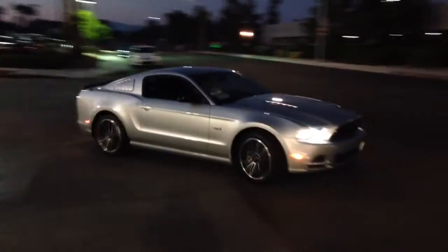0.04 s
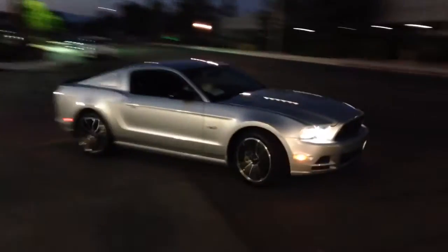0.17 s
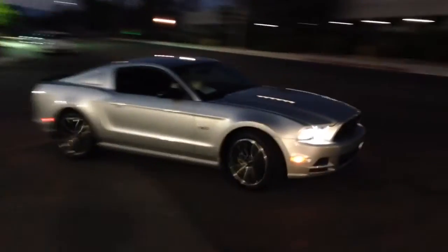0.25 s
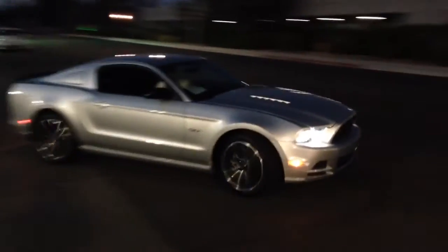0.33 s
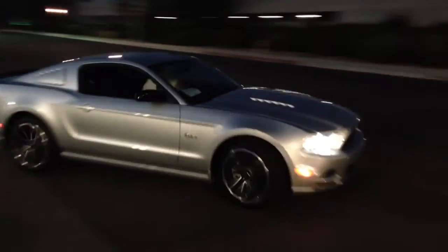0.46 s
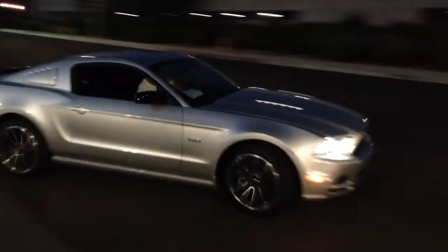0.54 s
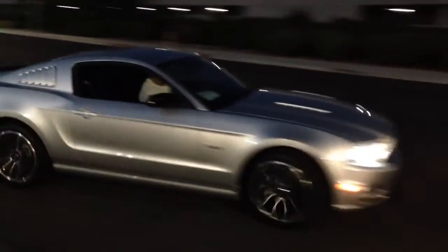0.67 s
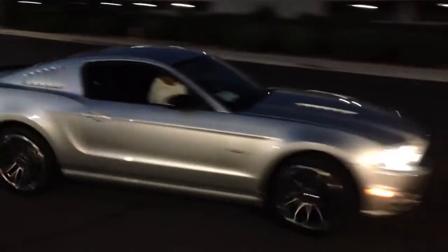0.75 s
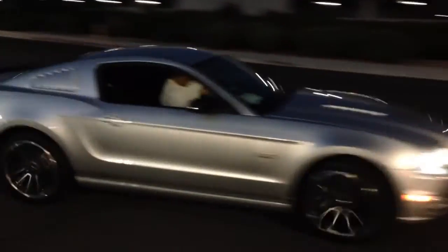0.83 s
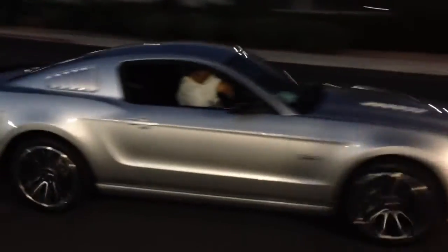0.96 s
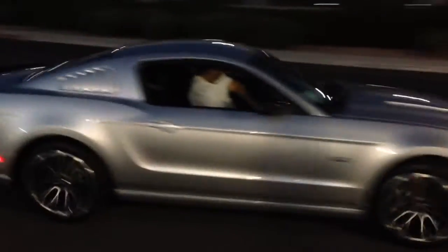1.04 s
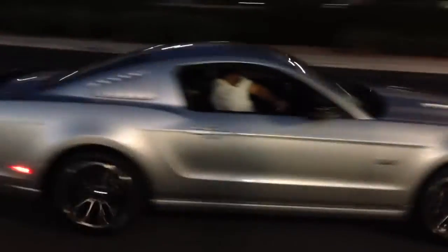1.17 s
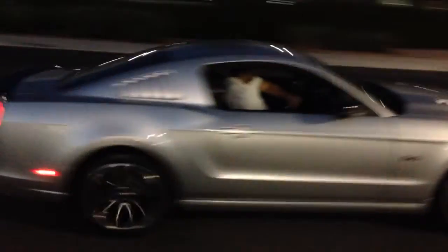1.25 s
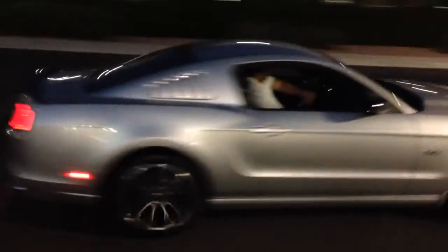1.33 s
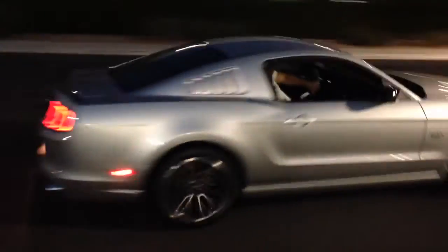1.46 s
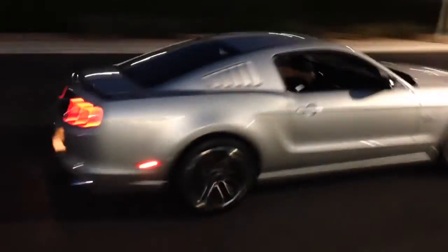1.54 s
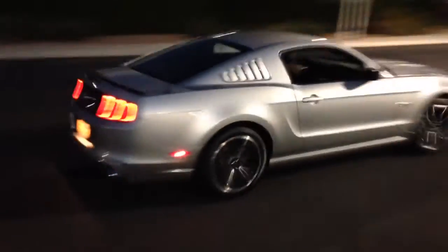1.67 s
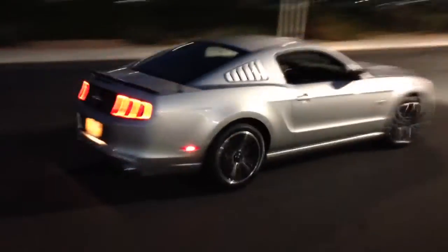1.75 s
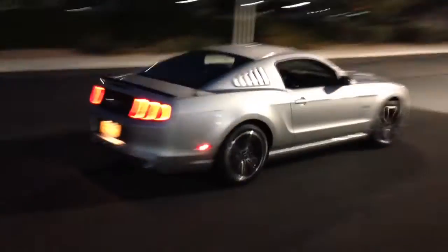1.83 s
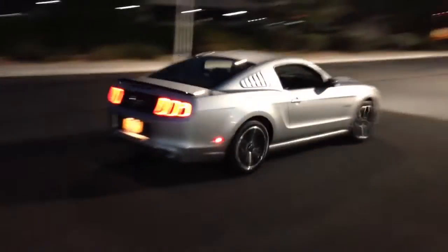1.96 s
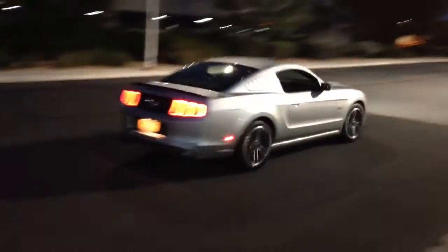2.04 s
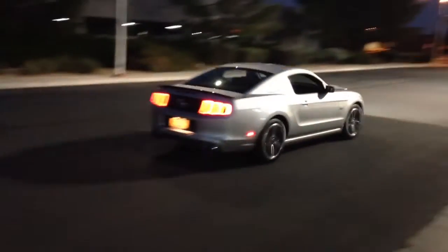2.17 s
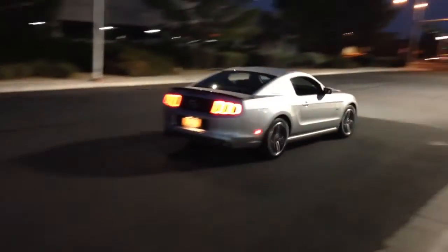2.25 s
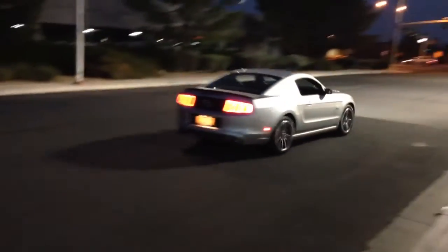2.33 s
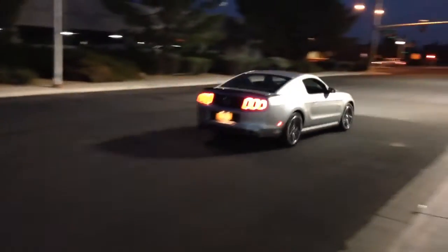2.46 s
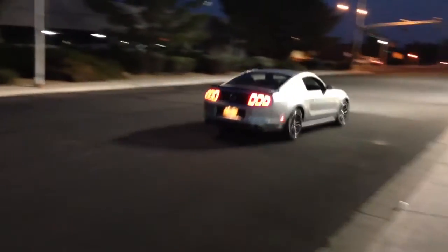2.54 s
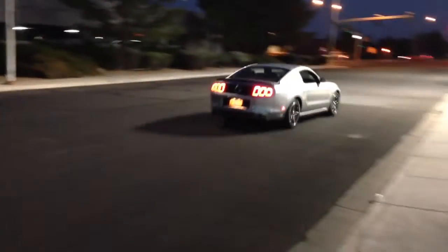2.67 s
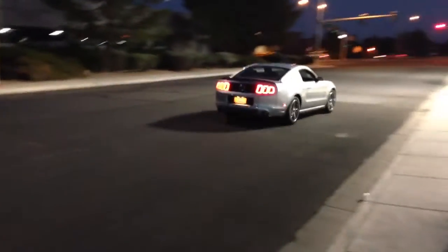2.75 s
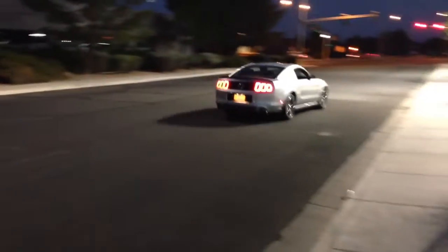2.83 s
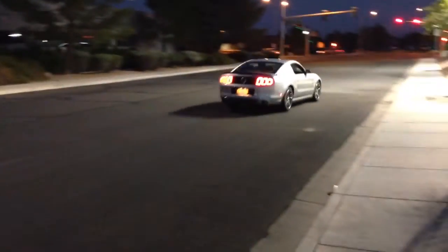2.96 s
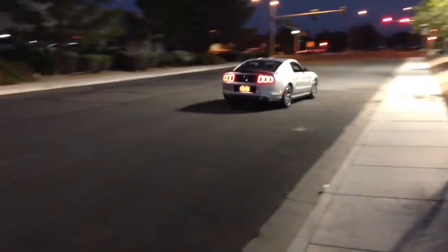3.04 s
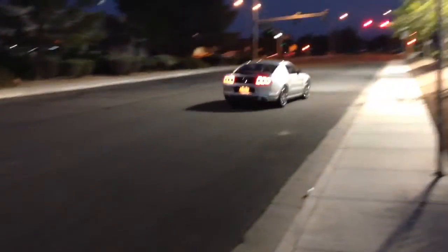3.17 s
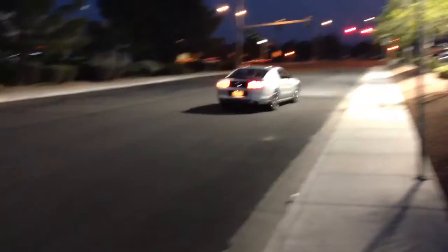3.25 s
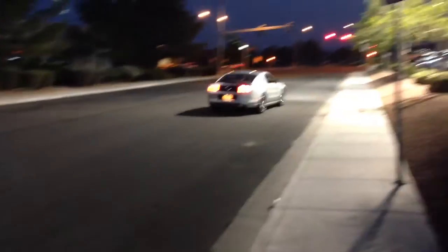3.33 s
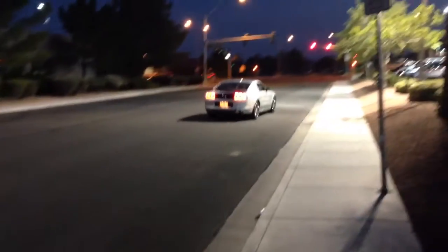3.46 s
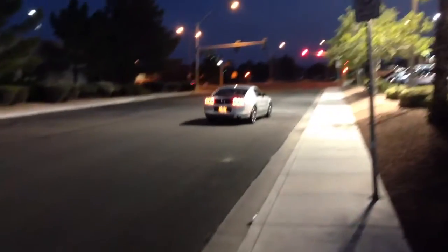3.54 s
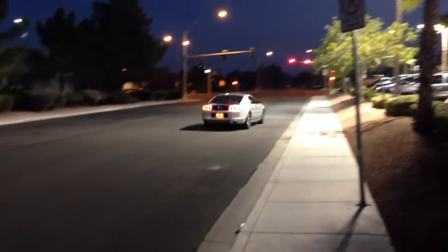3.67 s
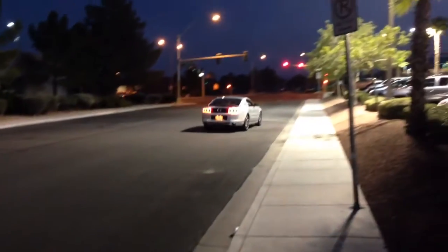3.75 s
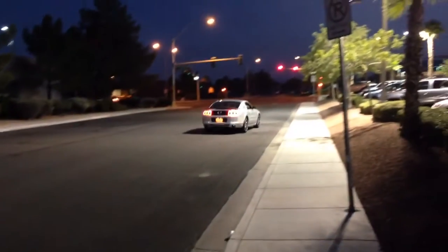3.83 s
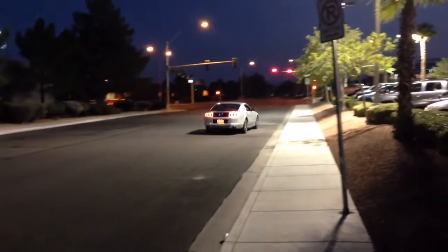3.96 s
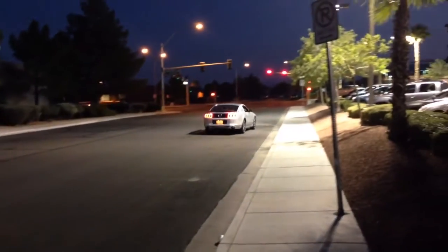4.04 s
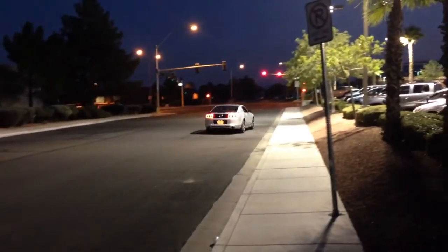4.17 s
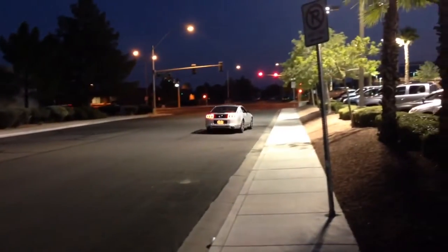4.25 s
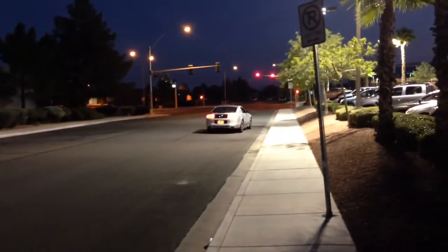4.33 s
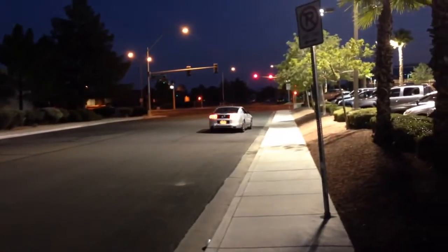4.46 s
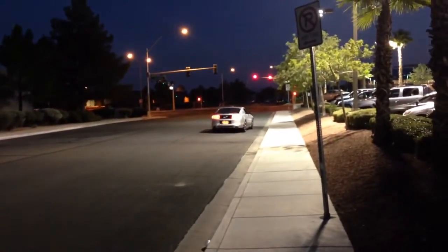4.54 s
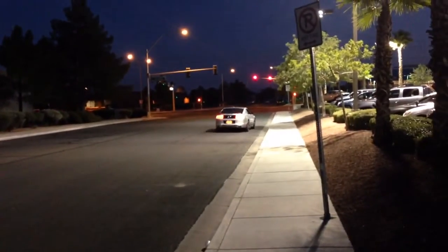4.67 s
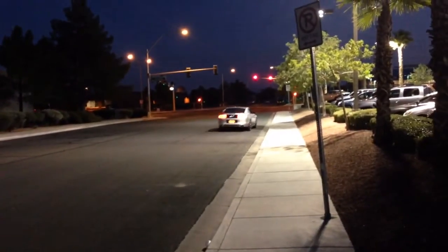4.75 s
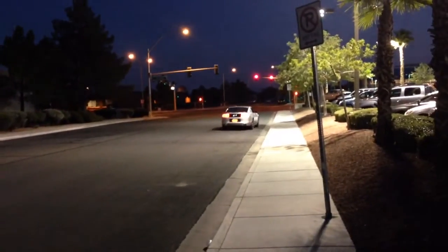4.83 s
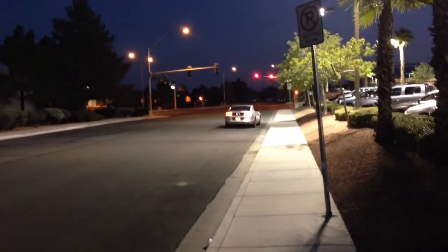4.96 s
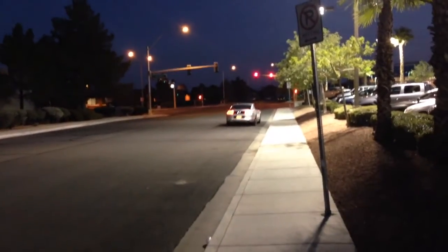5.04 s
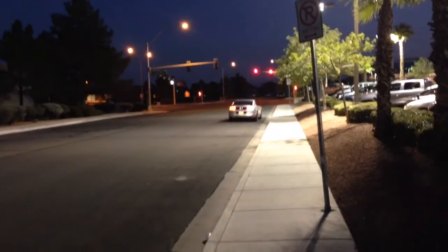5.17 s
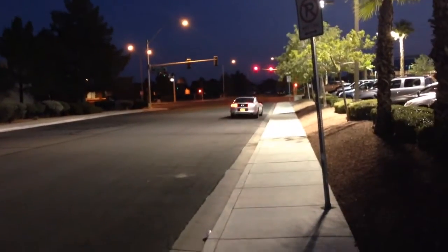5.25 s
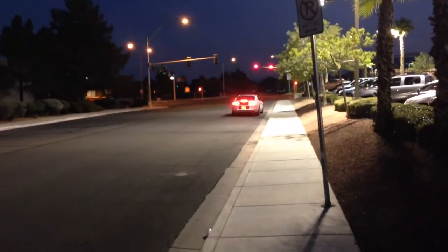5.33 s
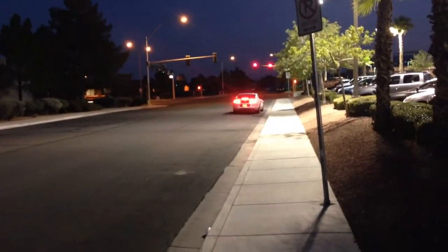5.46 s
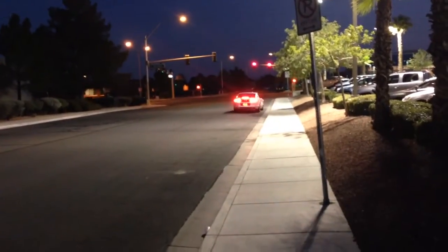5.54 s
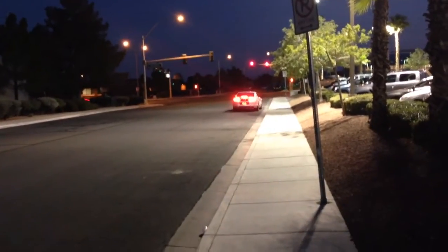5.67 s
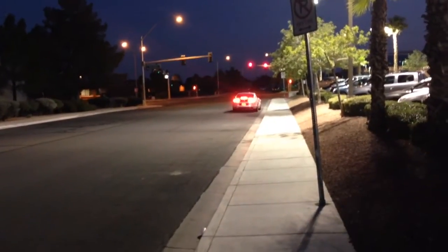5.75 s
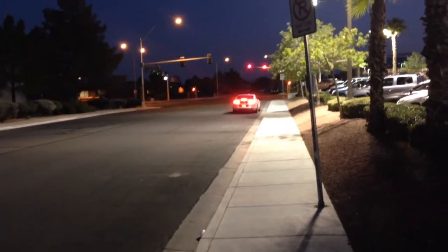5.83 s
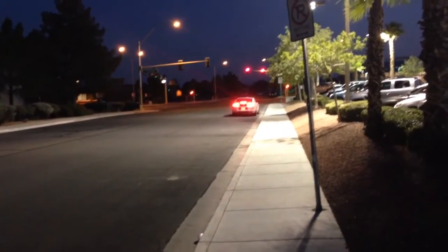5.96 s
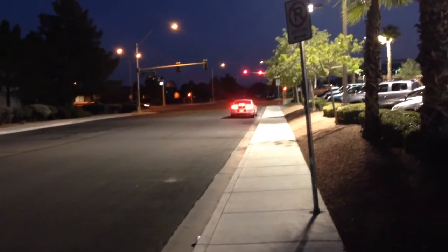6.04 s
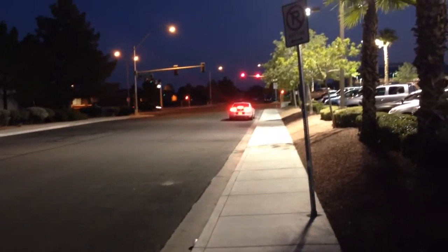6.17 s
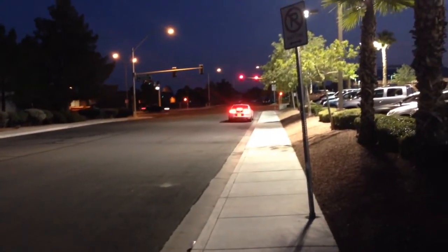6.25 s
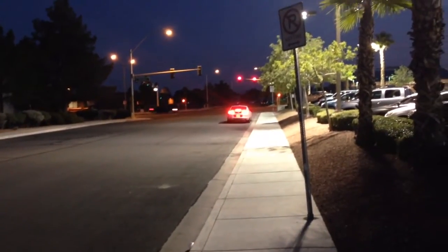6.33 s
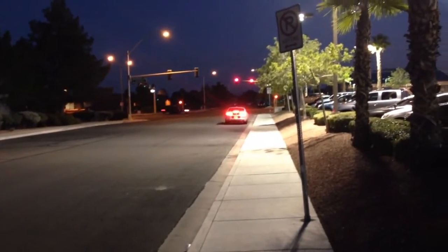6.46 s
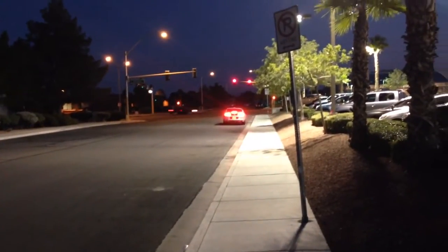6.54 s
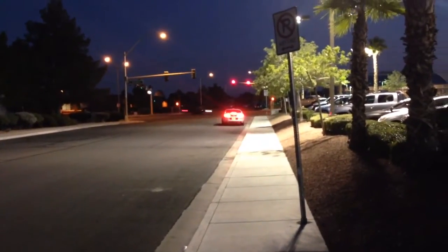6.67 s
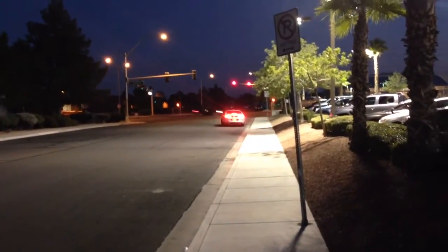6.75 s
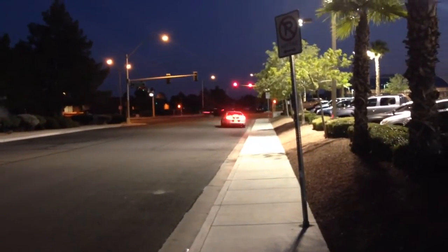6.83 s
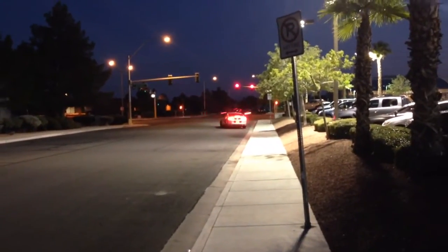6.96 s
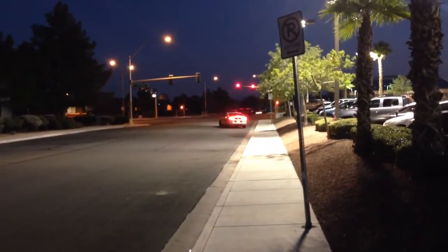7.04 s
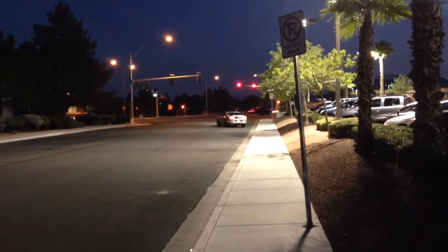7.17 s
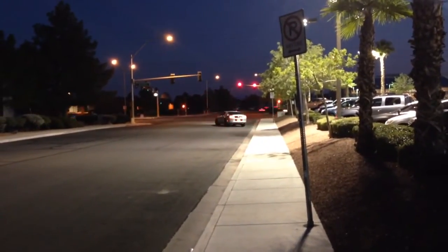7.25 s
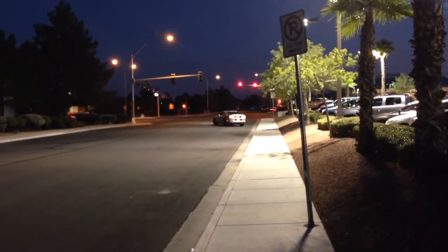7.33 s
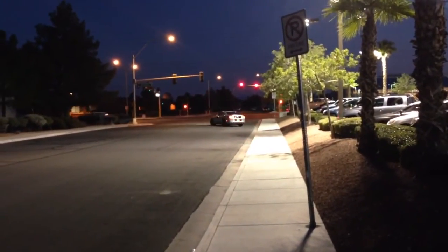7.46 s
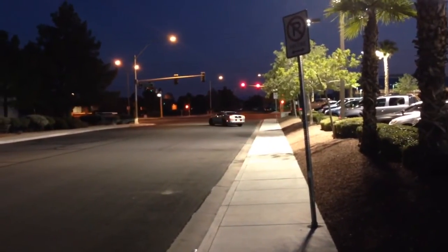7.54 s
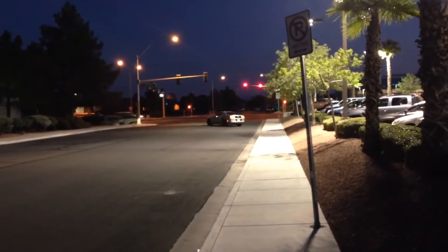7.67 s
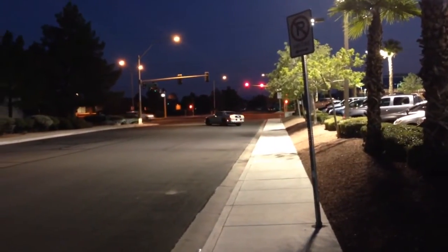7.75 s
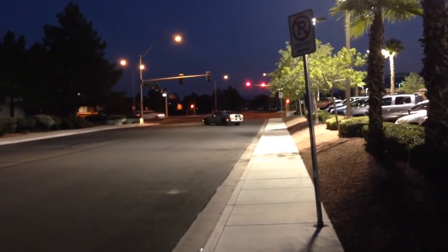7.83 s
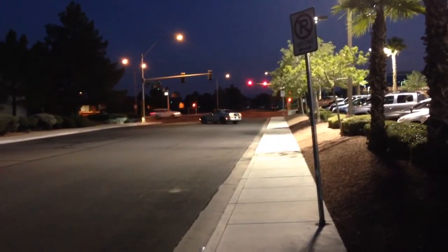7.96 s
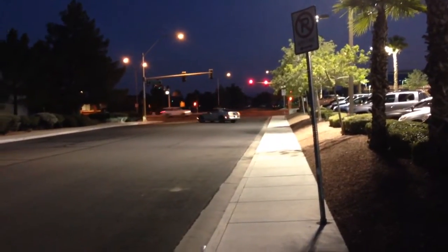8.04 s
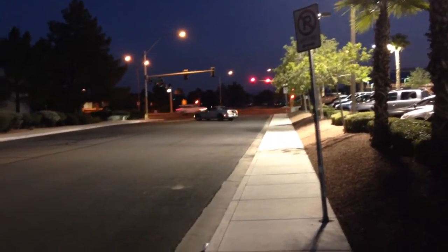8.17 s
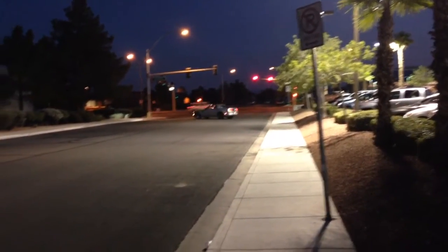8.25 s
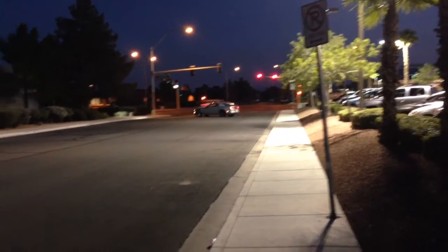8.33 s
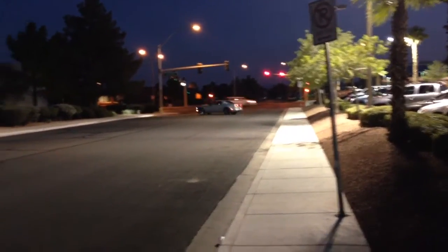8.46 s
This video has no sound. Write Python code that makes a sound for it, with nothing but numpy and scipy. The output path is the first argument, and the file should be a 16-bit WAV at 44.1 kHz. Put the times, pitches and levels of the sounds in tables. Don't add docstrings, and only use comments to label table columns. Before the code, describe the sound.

Open night street, roadside microphone. At 0 s a V8 car is already near, its deep, tonal exhaust growl under power. The pitch climbs steadily and the level swells from 0.8 s; it is loudest about 1-1.9 s, with a raw, bright gas rasp from the passing tailpipes and light tyre hiss. From 2 s it recedes quickly, pitch levelling near 2.5 s and the note softening by 3 s. At about 3.4 s the throttle shuts: uneven burble and rapid pops, thickening until one huge, sharp backfire crack at 4.05 s with a short street echo, then smaller crackles to 4.5 s. A smoother, hollow drone slides down in pitch from 4.6 to 6.3 s, swelling slightly around 5 s. Between 6.4 and 7.4 s come muffled distant pops and lumpy burble. By 7.5-8.5 s only a faint slow lope remains over low town rumble and soft microphone hiss.

```python
import sys
import numpy as np
from scipy import signal
from scipy.fft import rfft, irfft, next_fast_len
from scipy.io import wavfile
from scipy.ndimage import uniform_filter1d, minimum_filter1d, map_coordinates

SR = 44100
rng = np.random.default_rng(int(sys.argv[2]) if len(sys.argv) > 2 else 0)


def generate_wav(sig):
    pcm = np.round(np.clip(np.atleast_2d(sig).T, -1, 1) * 32767).astype(np.int16)
    wavfile.write(sys.argv[1], SR, pcm)


def gain_from_db(level_db):
    decades = np.asarray(level_db, float) / 20
    return 10 ** decades


N = 374850

# (t/s, cycles a second/Hz)
CYCLE = [(0.0, 18.07), (0.4, 18.75), (0.75, 19.76), (1.06, 21.01), (1.68, 24.22), (2.08, 25.61),
         (2.49, 26.46), (2.86, 26.32), (3.5, 25.99), (4.5, 23.24), (4.8, 22.74), (5.8, 19.64),
         (6.42, 17.08), (7.0, 14.97), (7.4, 13.51), (8.05, 11.55), (8.5, 11.43)]
# (t/s, 0 far, 1 nearing, 2 near, 3 abreast, 4 alongside, 5 passing, 6 past,
# 7 turning away, 8 leaving, 9 lifting off, 10 overrun, 11 braking)
STATE = [(.17, 0), (.25, 1), (.48, 1), (.6, 2), (.78, 2), (.85, 3), (1.1, 3), (1.22, 4), (1.4, 4), (1.5, 5),
         (1.68, 5), (1.78, 6), (2.02, 6), (2.2, 7), (2.32, 7), (2.45, 8), (2.8, 8), (3.02, 9), (3.3, 9),
         (3.7, 10), (5.25, 10), (5.75, 11)]
STRONGEST = [.98, .06, .01, .35, .52, .55, .51, .11, .08, .42, .14, .36]
# (f/Hz, width/Hz, level/dB)
PIPE = [(160, 107, -5.5), (248.3, 64.4, 1.5), (312, 90, -3), (452, 35.5, -4)]


def unit(x):
    return x / np.sqrt(np.mean(x ** 2) + 1e-20)


def curves(rows):
    s, *cols = np.transpose(rows)
    return [np.interp(np.arange(N) / SR, s, c) for c in cols]


def wobble(rate, order=0):
    knots = rng.standard_normal(int(N * rate / SR) + 4)
    return map_coordinates(knots, [np.arange(0, N, 2 ** order) * rate / SR], order=1)


def filtered(x, response):
    m = next_fast_len(len(x) + SR // 2)
    return irfft(rfft(x, m) * response(np.fft.rfftfreq(m, 1 / SR)), m)[:len(x)]


def coloured(x, spectrum):
    hz, db = np.transpose(spectrum)
    return unit(filtered(x, lambda f: gain_from_db(np.interp(np.log(f + 1), np.log(hz), db))))


def resonant(x, modes):
    def response(f):
        total = 0
        for k, (c, w, db) in enumerate(modes):
            total = total + (-1) ** k * gain_from_db(db) * 1j * f * w / (c * c - f * f + 1j * f * w)
        return total
    return filtered(x, response)


def blows(times, dbs, modes, edge_hz):
    x = np.zeros(N)
    x[np.round(np.asarray(times) * SR).astype(int)] = gain_from_db(dbs)
    treble_loss = signal.butter(4, edge_hz, fs=SR, output="sos")
    one = signal.sosfilt(treble_loss, resonant(np.arange(SR // 4) == 0, modes))
    return signal.oaconvolve(x, one / np.abs(one).max())[:N]


def exhaust():
    # (t/s, level/dB)
    note_level = [(0, -22), (.35, -19.5), (.55, -20), (.8, -16.5), (1.02, -13), (1.85, -12), (2, -16),
                  (2.15, -18), (2.4, -21.5), (2.9, -28), (3.35, -32.5), (3.75, -30.5), (4.5, -30.5),
                  (5.04, -26), (5.65, -30), (6.55, -34), (7.45, -44), (8.5, -47.5)]
    # (t/s, share 0-1)
    uneven_share = [(0, .04), (.8, .02), (2.2, .01), (2.8, .02), (3.2, .12), (3.4, .75), (4.45, .75),
                    (4.65, .05), (6.3, .14), (6.7, .55), (7.4, .85), (8.5, .85)]
    facing_from_s, facing_to_s, turn_s = 1.213, 2, .13
    rasp_db, side_db, shut_db = -15, 1, -4.5
    turns = np.cumsum(curves(CYCLE)[0]) / SR
    uneven, state = curves(uneven_share)[0], curves(STATE)[0]
    lumps = burble(turns)
    low = np.sqrt(1 - uneven) * note(turns, drift_db=1.4, drift_rad=.2) + np.sqrt(uneven) * lumps
    t = np.arange(N) / SR
    side = np.clip(np.minimum(t - facing_from_s, facing_to_s - t) / turn_s, 0, 1)
    gas = gas_noise(turns, state, side)
    shut = np.clip(state - 9, 0, 1)
    harsh = gain_from_db(rasp_db + side_db * side + shut_db * shut) * rasp(gas, side, uneven, lumps)
    return gain_from_db(curves(note_level)[0]) * (gain_from_db(surges()) * low + harsh) + idle_lope(turns) + far_roar(gas)


def note(turns, drift_db, drift_rad):
    # (f/Hz, width/Hz, level/dB)
    mouth = [(386, 60, 2.5), (471.6, 24, 3.5), (603, 15, 0), (792, 43, 5.5), (964, 17, 10.5)]
    # (f/Hz, width/Hz, level/dB)
    coasting = [(169.2, 7, 6.5), (233.7, 14.5, 6.5), (342, 12, 6), (370, 36, -4)]
    spread = [.35, .6, .6, .9, .7, .7, .7, 1.2, 1.2, 1.6, 1.2, 1.3]
    leading = np.array([17.5, 17.5, 17.5, 18, 16.5, 16.5, 16.5, 19.5, 19.5, 19.5, 9, 13])
    trailing = [.2, .4, .3, .3, .4, .4, .38, .45, .45, 0, 0, 0]
    banks = [0, -.12, -.12, .05, .17, .09, .1, 0, 0, 0, 0, 0]
    group = 1.5
    step = 8
    state, rate = curves(STATE)[0][::step], curves(CYCLE)[0][::step]
    sound, power = 0, 0
    for order, dbs in enumerate(balance(), 5):
        states = np.arange(len(dbs))
        looseness = np.clip(np.abs(order - leading) / 2.44, .2, 1.5)
        lag = 2 * np.pi * order * np.array(STRONGEST) + looseness * spread * rng.standard_normal(len(dbs))
        lag = lag - 2 * np.pi * np.maximum(leading - group - order, 0) * trailing
        lag = lag - 2 * np.pi * (order % 2) * np.array(banks)
        phase = np.angle(np.interp(state, states, gain_from_db(dbs) * np.exp(-1j * lag)))
        lift_db = lift(mouth, order * rate) + np.clip(state - 9, 0, 1) * lift(coasting, order * rate)
        gain = gain_from_db(np.interp(state, states, dbs) + lift_db)
        power = power + gain ** 2 / 2
        phase = phase + drift_rad * max(1, order / 20) * wobble(4.3, order=3)
        phase = phase + 2 * np.pi * order * turns[::step]
        sound = sound - gain * gain_from_db(drift_db * wobble(5.4, order=3)) * np.cos(phase)
    sound = signal.resample_poly(sound / np.sqrt(power), step, 1)[:N]
    return filtered(sound, lambda f: f ** 4 / (f ** 4 + 95 ** 4))


def balance():
    lower = [(-25, -18, -12, -4, -15, -14, -13, -8, -14, -5, -8, 0, -2, -8, -2, -6),
             (-34, -17, -14, -10, -16, -14, -12, -11, -19, -16, -11, 0, -8, -13, -6, -16),
             (-35, -11, -12, -11, -10, -12, -14, -10, -17, -13, -8, 0, -6, -5, -12, -18),
             (-25, -13, -16, -4, -14, -9, -3, -6, -14, -5, -8, -6, -1, -8, 0, -4),
             (-28, -17, -18, -13, -17, -6, -12, -11, -13, -12, -6, 0, -10, -5, -18, -20),
             (-30, -14, -17, -1, -10, -6, -18, -5, -14, -4, 0, 0, -8, -9, -18, -18),
             (-23, -14, -20, -12, -14, -15, -13, -9, -15, -5, -6, 0, -13, -12, -28, -32),
             (-14, -6, -17, -16, -15, -19, 0, -6, -19, -12, -16, -8, -12, -24, 0, -8),
             (-14, -5, -13, -11, -18, -17, -6, -13, -14, -8, -22, -14, -14, -14, 0, -4),
             (-11, -1, -3, 0, -10, -10, -6, -17, -12, -12, -15, -7, -15, -13, -6, -9),
             (-15, -2, -5, -3, -12, 0, -21, -11, -12, -13, -8, -13, -15, -15, -17, -9),
             (-20, -1, -6, -10, -8, -1, -12, -4, -12, -4, -4, -3, -18, -14, -20, -13)]
    # (level at order 21/dB, slope/dB per order)
    upper_rule = [(-7, -1), (-17, -.5), (-14, -.8), (-19, -.9), (-21, -.4), (-29, 0), (-34, -.3),
                  (-22, -.3), (-21, -.4), (-14, -.5), (-22, -.9), (-17, -.8)]
    even_db, firing_db, top_order = 2, 2, 38
    orders = np.arange(21, top_order + 1)[:, None]
    start_db, slope_db = np.transpose(upper_rule)
    upper = start_db + slope_db * (orders - 21)
    upper = upper + even_db * (-1.) ** orders + firing_db * (orders % 8 == 0)
    return np.vstack([np.transpose(lower), upper])


def lift(modes, hz):
    return sum(db * np.exp(-((hz - centre_hz) / width) ** 2) for centre_hz, width, db in modes)


def surges():
    # (t/s, length/s, level over the note/dB)
    humps = [(3.44, 0.041, 3), (3.58, 0.074, 1.5), (3.696, 0.04, -0.5), (3.91, 0.29, 3),
             (4.042, 0.065, 6.5), (4.35, 0.26, 4.5), (6.663, 0.063, 0), (6.977, 0.16, 4.5),
             (7.12, 0.096, 3.5), (7.254, 0.027, 6), (7.305, 0.07, 8.5), (7.383, 0.046, 6)]
    t = np.arange(N) / SR
    return sum(db * np.exp(-np.abs(2 * (t - s) / length) ** 3) for s, length, db in humps)


def firings(turns, scatter_db, pattern_db):
    jitter_s = .0002
    count = np.floor(8 * turns).astype(int)
    at = np.flatnonzero(np.diff(count)) + 1
    cylinder = rng.standard_normal(8)[count[at] % 8]
    shift = np.round(jitter_s * SR * rng.standard_normal(N)[:len(at)]).astype(int)
    at = np.clip(at + shift, 0, N - 1)
    x = np.zeros(N)
    x[at] = gain_from_db(pattern_db * cylinder + scatter_db * rng.standard_normal(N)[:len(at)])
    return x


def burble(turns):
    lumps = firings(turns, scatter_db=4, pattern_db=2) * np.sign(wobble(150))
    ringing = resonant(resonant(lumps, [(250, 400, 0)]), PIPE)
    return unit(ringing * gain_from_db(1.5 * wobble(14)))


def turbulence(turns):
    repeating, memory, size = .62, 4, 1024
    age = turns / memory
    patterns = rng.standard_normal((int(age[-1]) + 2, size))
    row, at = age.astype(int), (turns % 1 * size).astype(int)
    turn = np.pi / 2 * (age % 1)
    again = np.cos(turn) * patterns[row, at] + np.sin(turn) * patterns[row + 1, at]
    return np.sqrt(repeating) * again + np.sqrt(1 - repeating) * rng.standard_normal(N)


def gas_noise(turns, state, side):
    swell_db = [3, 2, 2.5, 1.5, 2, 2, 2, 3, 7, 3, 3, 3]
    fronts_far, fronts_side = .55, 1.4
    late = np.interp(state, np.arange(len(STRONGEST)), STRONGEST)
    depth_db = np.interp(state, np.arange(len(swell_db)), swell_db)
    swell = gain_from_db(depth_db * np.cos(2 * np.pi * (turns - late)))
    fronts = swell * firings(turns + .08, scatter_db=2.5, pattern_db=4)
    puffs = signal.lfilter([1], [1, -np.exp(-1 / (0.0055 * SR))], fronts)
    return (unit(puffs) + .9) * turbulence(turns) + (fronts_far + fronts_side * side) * unit(fronts)


def rasp(gas, side, uneven, lumps):
    # (f/Hz, level/dB per Hz)
    side_colour = [(300, -21), (520, -11), (595, 2.5), (670, -13), (765, 0), (845, -15.5), (920, 3),
                   (1000, -5.5), (1130, 0), (1320, 0.5), (1550, -11.5), (2050, -14), (2500, -22.5),
                   (4500, -91)]
    # (f/Hz, level/dB per Hz)
    past_colour = [(300, -21), (590, 0), (750, -23), (950, -3), (1100, 0), (1340, -1), (1550, -11.5),
                   (2050, -15.5), (2500, -18), (4500, -95)]
    # (f/Hz, level/dB per Hz)
    far_colour = [(300, -14), (550, 2.5), (680, -7.5), (790, -1), (850, 0.5), (925, -3), (1100, -6),
                  (1500, -10.5), (2000, -9.5), (2500, -16.5), (3500, -45), (6000, -120)]
    # (t/s, length/s, level against the rasp/dB)
    beam = (2.01, 0.53, -9)
    # (f/Hz, width/Hz, level/dB)
    beam_tone = [(1890, 650, 0)]
    past_s, swing_s, bunching = 1.76, .2, .5
    t = np.arange(N) / SR
    past = np.clip((t - past_s) / swing_s + .5, 0, 1)
    facing = (1 - past) * coloured(gas, side_colour) + gain_from_db(-2.0) * past * coloured(gas, past_colour)
    sound = np.sqrt(side) * facing + np.sqrt(1 - side) * coloured(gas, far_colour)
    beam_s, length_s, beam_db = beam
    sweep = gain_from_db(beam_db) * np.exp(-(2 * (t - beam_s) / length_s) ** 2)
    sound = sound + sweep * unit(resonant(resonant(gas, beam_tone), beam_tone))
    lump_size = uniform_filter1d(np.abs(lumps), size=500)
    return sound * (1 - bunching * uneven + 1.7 * bunching * uneven * lump_size)


def idle_lope(turns):
    # (t/s, peak level/dB)
    idle = [(7.4, -55), (7.7, -43), (7.85, -38), (8.1, -39.5), (8.5, -39)]
    # (f/Hz, width/Hz, level/dB)
    lump = [(486, 43, 3), (400, 83, -1)]
    at = (np.flatnonzero(np.diff(np.floor(turns - .55))) + 1) / SR
    at = at[at > idle[0][0]]
    scatter_db = 2 * rng.standard_normal(N)[:len(at)]
    first = blows(at, np.interp(at, *np.transpose(idle)) + scatter_db, lump, edge_hz=840)
    return first + gain_from_db(-4.0) * np.roll(first, round(0.016 * SR))


def far_roar(gas):
    # (f/Hz, level/dB per Hz)
    roar = [(300, -16), (550, 0.5), (900, -2), (1250, -9.5), (1500, -4), (1800, -12), (2500, -10.5),
            (3500, -42.5), (6000, -120)]
    roar_db, braked_s, braking_db_per_s = -52.5, 6.46, -20
    slowing_s = np.maximum(np.arange(N) / SR - braked_s, 0)
    return gain_from_db(roar_db + braking_db_per_s * slowing_s + 3.5 * wobble(25)) * coloured(gas, roar)


def pops():
    # (t/s, crack peak/dB, thump/dB, top/dB)
    near_pops = [(3.371, -32, 0, -33), (3.414, -31.5, 6, -37), (3.533, -35, 3, -38.5),
                 (3.764, -24.5, -3, -40), (3.802, -31.5, 12, -32), (3.842, -21.5, 0, -43),
                 (3.884, -26.5, 9, -42), (3.948, -28, 10.5, -44), (4.0189, -16.5, -3, -24),
                 (4.083, -34.5, 12, -28), (4.167, -34, 6, -30), (4.208, -24, 4.5, -46),
                 (4.249, -29, 5, -39), (4.299, -31.5, 7, -40), (4.349, -26.5, -7, -42),
                 (4.375, -34, -4, -41), (4.423, -31.5, 9, -39), (4.465, -32.5, 15.5, -36),
                 (4.504, -37, -2, -33), (4.527, -43, 0, -38)]
    # (t/s, peak/dB, thump/dB)
    far_pops = [(6.376, -29, -1), (6.554, -24.5, -9), (6.617, -27, 9), (6.645, -20, 5.5),
                (6.666, -21.5, -2), (6.68, -28, -5), (6.777, -32, 7.5), (6.809, -45, -2.5),
                (6.868, -46, -4), (6.938, -27, 2), (6.988, -33, 11), (7.035, -25.5, -2), (7.104, -24.5, -7),
                (7.156, -42, 3), (7.223, -44, 6), (7.254, -39, -3), (7.292, -38, 3), (7.384, -37, -1)]
    # (f/Hz, width/Hz, level/dB)
    crack = [(455, 450, -2), (866, 140, 9.5), (1550, 250, -0.5)]
    # (f/Hz, width/Hz, level/dB)
    far_crack = [(460, 67, 9), (910, 170, -2.5), (1660, 1500, -20)]
    # (f/Hz, width/Hz, level/dB)
    top = [(2120, 176, 11), (3780, 830, -12), (6450, 1400, -22)]
    # (t/s, peak/dB)
    backfire = (4.0472, -4.7)
    # (f/Hz, width/Hz, level/dB)
    bang_modes = [(565, 650, 3.5), (1960, 1020, 2), (3730, 910, -9.5), (6600, 700, -29)]
    push_s, push_db = .00035, -6
    s, db, thump_db, top_db = np.transpose(near_pops)
    s = s + .0006
    near = blows(s, db + 5.5, crack, edge_hz=1340) + blows(s, db + top_db + 8, top, edge_hz=6000)
    near = near - blows(s, db + thump_db - 2.5, PIPE, edge_hz=2300)
    s, db, thump_db = np.transpose(far_pops)
    far = blows(s, db - 6.0, far_crack, edge_hz=2400) + blows(s, db + thump_db - 6.0, PIPE, edge_hz=590)
    bang = blows(backfire[:1], backfire[1], bang_modes, edge_hz=6800)
    return near + far, gain_from_db(push_db) * np.roll(bang, -round(push_s * SR)) - bang


def street(x, tail_db):
    # (f/Hz, t/s)
    decay = [(150, 0.64), (1000, 0.12), (2200, 0.17), (3300, 0.057), (8000, 0.03)]
    # (delay/s, level/dB)
    walls = [(.007, -23), (.014, -29), (.040, -28), (.085, -28)]
    hz, t, z = signal.stft(rng.standard_normal(SR // 2), SR, nperseg=256)
    decay_hz, decay_s = np.transpose(decay)
    t60 = np.interp(np.log(hz + 1), np.log(decay_hz), decay_s)
    tail = signal.istft(z * gain_from_db(-60 * t / t60[:, None]), SR, nperseg=256)[1]
    answer = np.pad(gain_from_db(tail_db) * tail / np.linalg.norm(tail), (80, 0))
    for s, db in walls:
        roughness = rng.standard_normal(round(.06 * s * SR))
        smear = np.convolve(roughness, np.hanning(14), "full")
        answer[round(s * SR):][:len(smear)] += gain_from_db(db) * smear / np.linalg.norm(smear)
    return signal.fftconvolve(x, answer)[:N]


def background():
    # (f/Hz, level/dB per Hz)
    hiss_colour = [(2100, -42), (3100, -1.5), (3900, -8.5), (5000, -14), (7600, -12), (10000, -20.5),
                   (13000, -29), (15500, -23.5)]
    # (f/Hz, level/dB per Hz)
    town_colour = [(22, -48), (42, -15.5), (60, -4), (78, -9), (95, -8.5), (250, -16), (500, -19.5),
                   (1000, -32), (2000, -34.5), (2600, -35.5), (3500, -65.5), (6000, -120)]
    closest_s, lane_m, nearing_m_s, leaving_m_s = 1.15, 3.05, 4.1, 5.66
    hiss_db, hiss_fall = -48.5, 1.42
    rumble_db, fade_db_per_s, gust_db, gust_hz = -43.5, -0.35, 0.5, 130
    t = np.arange(N) / SR - closest_s
    metres = np.hypot(lane_m, t * np.where(t < 0, nearing_m_s, leaving_m_s))
    hiss = coloured(rng.standard_normal(N) * gain_from_db(0.92 * wobble(40)), hiss_colour)
    town = coloured(rng.standard_normal(N), town_colour)
    deep = filtered(town, lambda f: 1 / (1 + (f / gust_hz) ** 4))
    town = town - deep + deep * gain_from_db(gust_db * wobble(7.8) - 2.0)
    tyres = gain_from_db(hiss_db) * (lane_m / metres) ** hiss_fall * hiss
    return tyres + gain_from_db(rumble_db + fade_db_per_s * t) * town


def scene():
    crackle, bang = pops()
    echoes = street(crackle, tail_db=-7.5) + street(bang, tail_db=-11)
    return (exhaust() + crackle + bang + echoes + background())[None]


def low_pass(x):
    return signal.sosfilt(signal.butter(12, 15330, fs=SR, output="sos"), x)


def record(dry):
    # (f/Hz, level/dB per Hz)
    self_noise = [(1000, -35.5), (2600, 1), (4000, 0.5), (8000, -3.5), (12000, -4.5), (15500, -6.5)]
    # (f/Hz, width/Hz, level/dB)
    notch = (2796, 240, -5)
    ceiling, limit_s = .71, .004
    hz, width, db = notch
    x = dry[0] + gain_from_db(-69.0) * coloured(rng.standard_normal(N), self_noise)
    x = filtered(x, lambda f: gain_from_db(db * np.exp(-((f - hz) / width) ** 4)))
    span = round(limit_s * SR)
    needed = minimum_filter1d(np.minimum(1, ceiling / (np.abs(x) + 1e-9)), size=2 * span)
    x = x * uniform_filter1d(uniform_filter1d(needed, size=span), size=span)
    return low_pass(x[None])


dry = scene()
out = record(dry)
generate_wav(out)
```